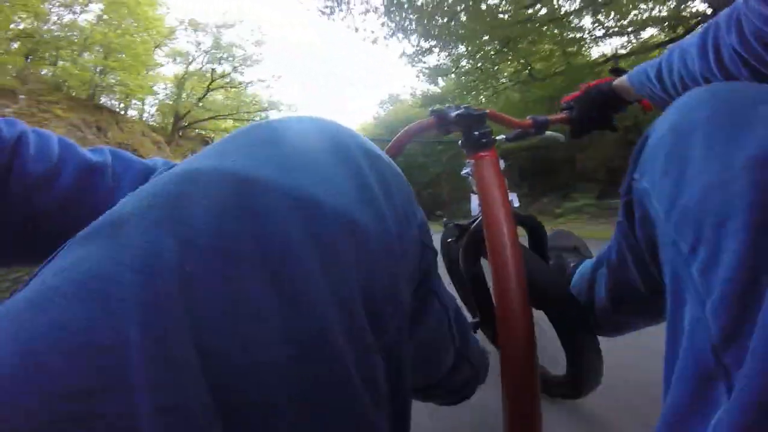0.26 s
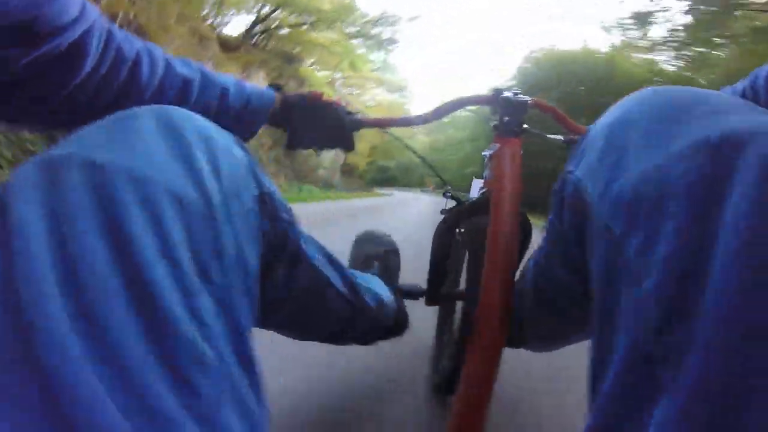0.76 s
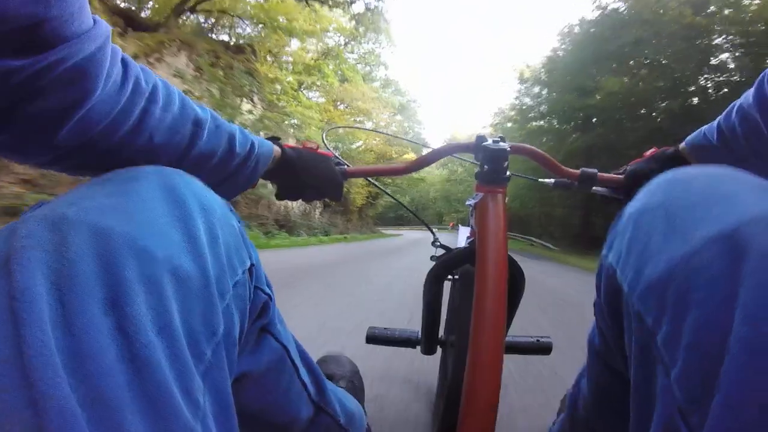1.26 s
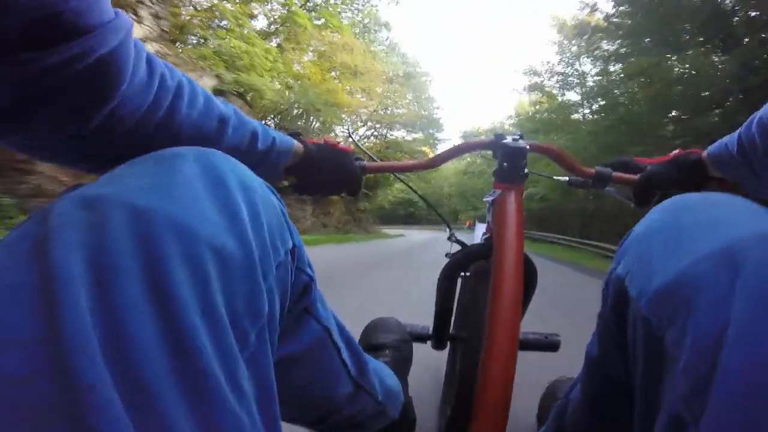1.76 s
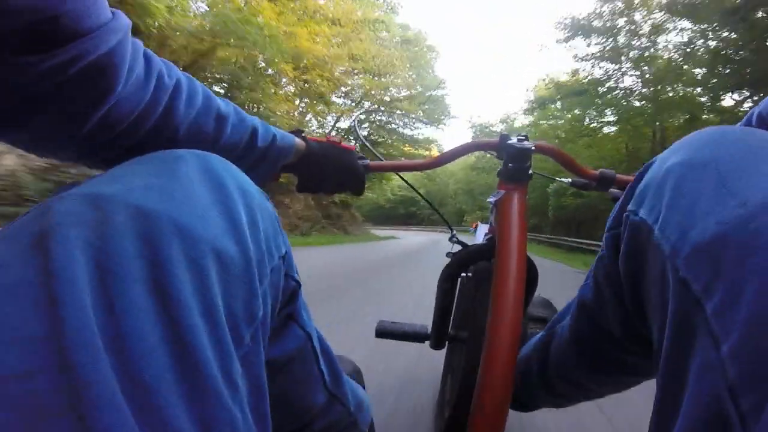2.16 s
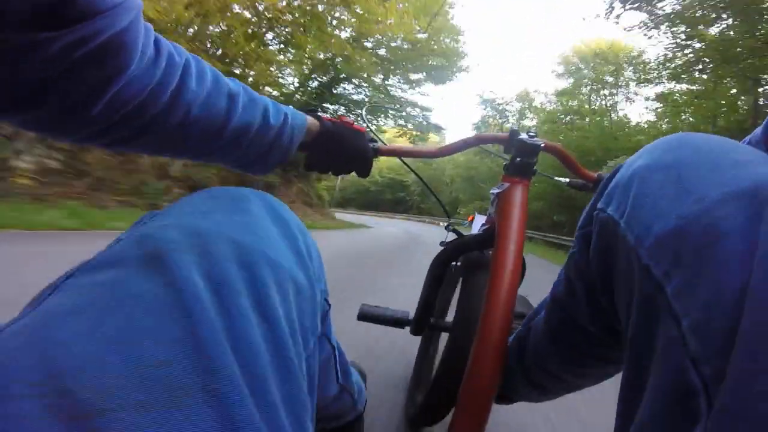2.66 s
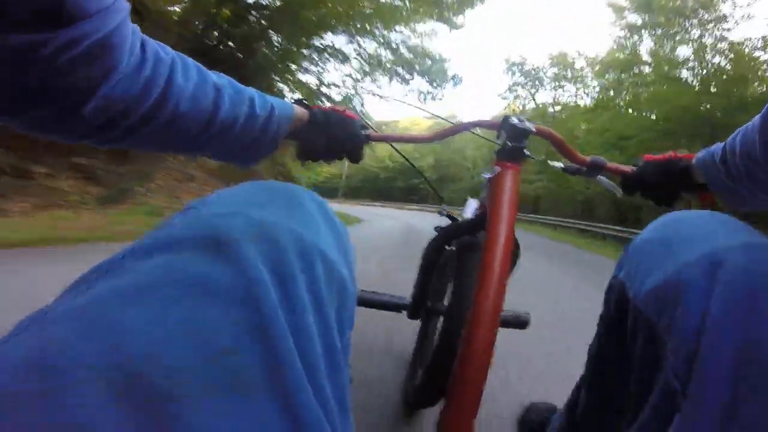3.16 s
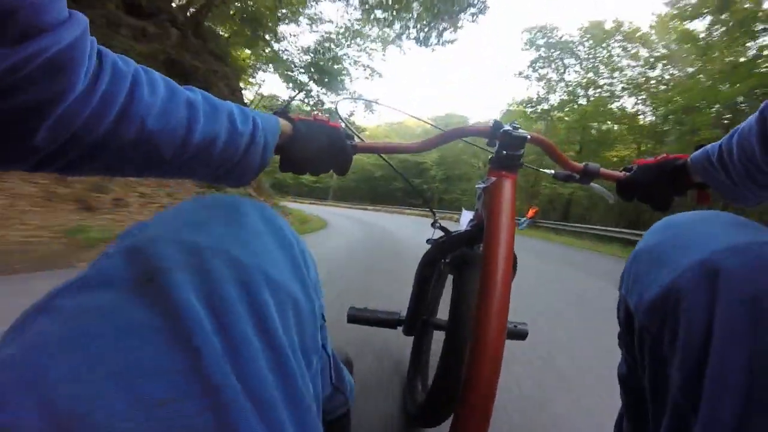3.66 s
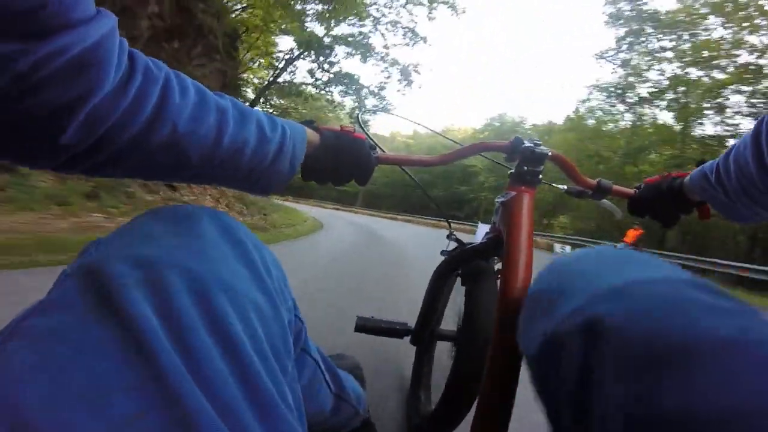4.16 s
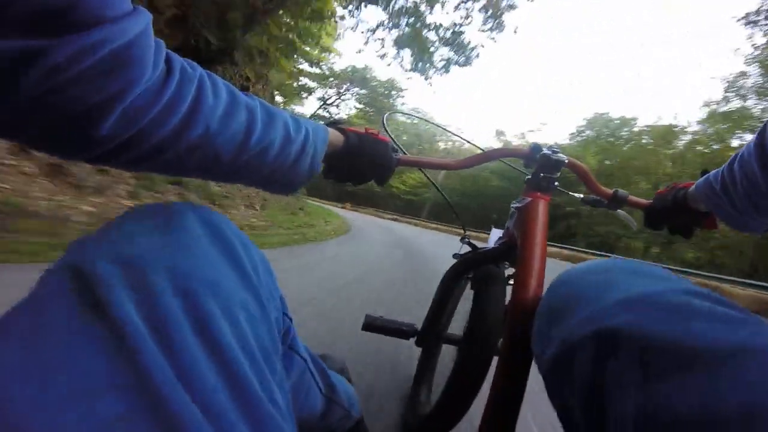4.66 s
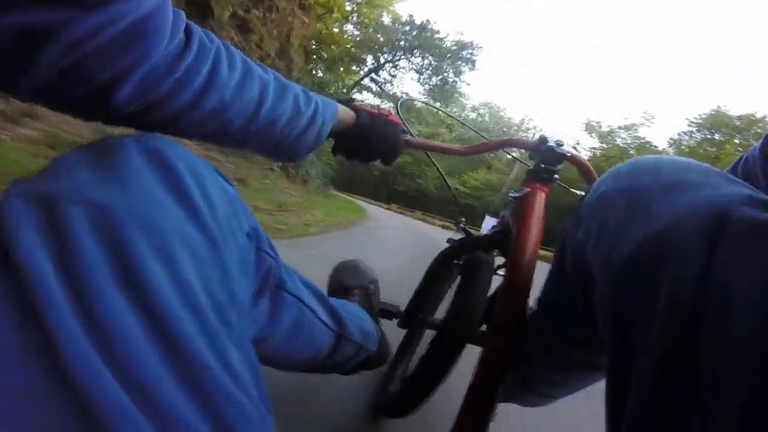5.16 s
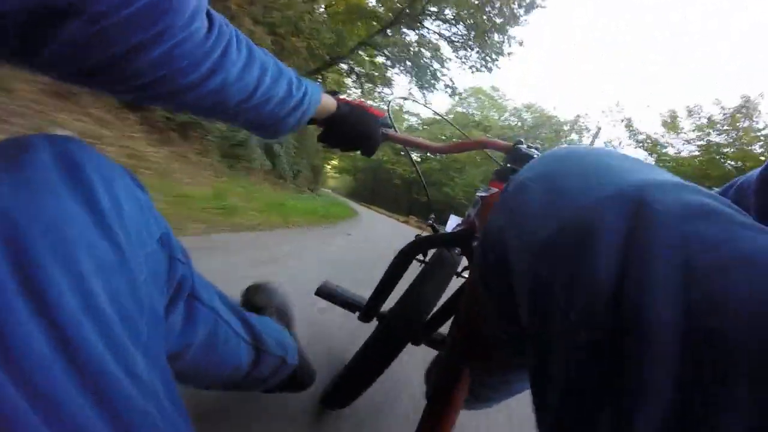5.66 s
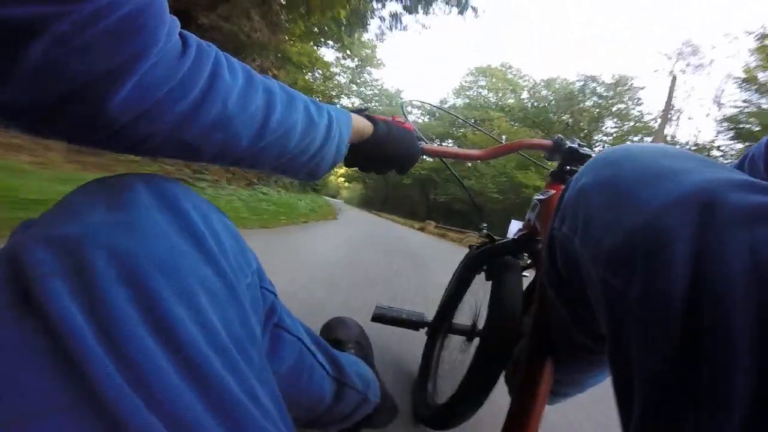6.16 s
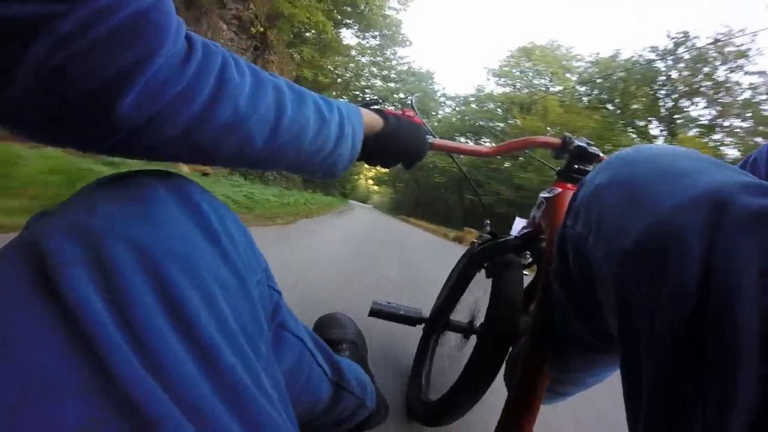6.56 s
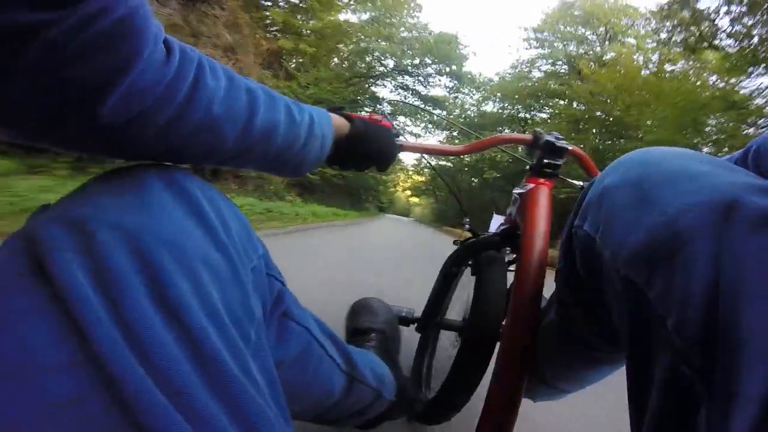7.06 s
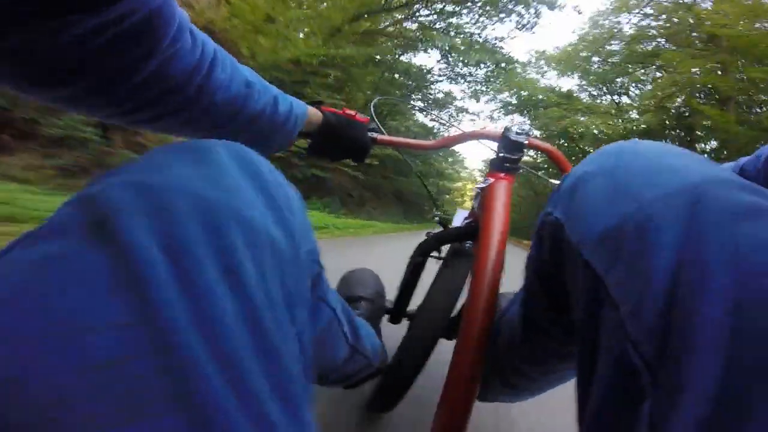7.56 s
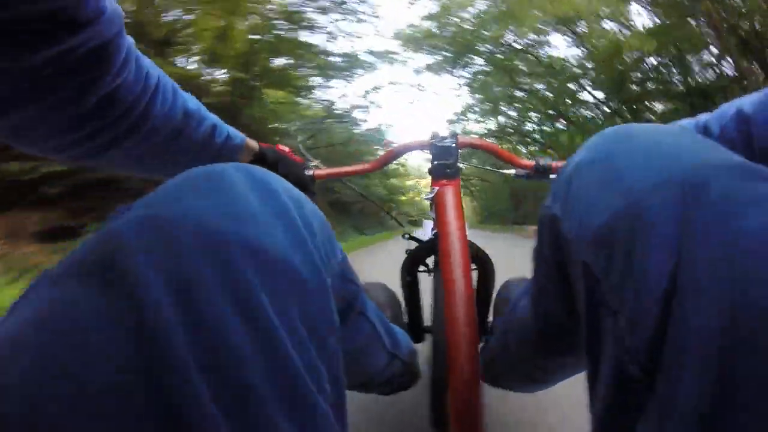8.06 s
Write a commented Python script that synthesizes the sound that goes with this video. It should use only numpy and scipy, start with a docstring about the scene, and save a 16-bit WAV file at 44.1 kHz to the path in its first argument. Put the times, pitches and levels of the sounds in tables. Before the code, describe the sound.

Hard hollow wheels whine and rumble fast over rough asphalt while stones tick and gusting wind flutters and thuds against a rider's microphone.

```python
"""A small trike with hard hollow wheels rolls and slides fast down rough asphalt.
The road's grit, made of noise and separate grains, shakes wheels and frame, which ring in fixed bands;
a stronger ring glides in pitch. Stones tick as short noise bursts, something squeaks in narrow trembling bands,
and the head wind rumbles, flutters and roars at a cased microphone on the rider."""
import sys
import numpy as np
from scipy import signal
from scipy.fft import rfft, irfft
from scipy.io import wavfile
from scipy.ndimage import uniform_filter1d

SR = 44100
rng = np.random.default_rng(int(sys.argv[2]) if len(sys.argv) > 2 else 0)


def dump(signal):
    """Clip the signal to [-1, 1] and save it as 16-bit WAV at the path in sys.argv[1]."""
    limited = np.clip(np.atleast_2d(signal).T, -1, 1)
    pcm = np.round(limited * 32767).astype(np.int16)
    wavfile.write(sys.argv[1], SR, pcm)


def attenuation_scalar(level_db):
    """Turn a level in dB into a linear amplitude multiplier (20 dB per decade)."""
    decades = np.asarray(level_db, float) / 20
    return 10 ** decades


N = 366894  # length of the scene in samples

# fixed ringing bands of the hollow wheels: (pitch [Hz], width before steepening [Hz], relative level [dB])
WHEEL = [(1230, 50, -22.5), (1792, 210, -11.5), (2256, 207, -5.5), (2685, 267, -7), (3077, 67, -15)]
# the ride: (time [s], rolling level [dB], pitch of the wheel's main ring [Hz], sideways sliding level [dB])
RIDE = [(0.03, -25, 1467, -34), (0.31, -33.5, 1507, -34), (0.72, -29, 1503, -36.5), (0.79, -26, 1484, -35),
        (1.67, -28, 1460, -33.5), (1.97, -30, 1465, -37.5), (2.48, -28, 1470, -38.5),
        (2.5, -29, 1445, -36.5), (2.52, -32, 1460, -41), (2.57, -26, 1470, -38), (2.78, -31.5, 1450, -36.5),
        (2.8, -29, 1430, -33.5), (3.38, -22.5, 1502, -30.5), (3.4, -25, 1504, -30),
        (3.68, -26.5, 1450, -32), (4.3, -30, 1450, -32.5), (5.09, -25, 1440, -29.5), (5.29, -28, 1460, -32),
        (5.34, -24.5, 1450, -28.5), (5.52, -28, 1478, -34.5), (6.22, -24, 1450, -28.5),
        (7.76, -29.5, 1453, -33.5), (8.11, -27.5, 1480, -37), (8.32, -27.5, 1480, -34)]
MEAN_ROLL_DB, MEAN_SLIDE_DB = -28, -33  # reference levels of the ride


def evened(x):
    """Scales to rms 1."""
    return x / np.sqrt(np.mean(x ** 2) + 1e-20)


def curves(rows):
    """The columns of a table after its time column, one value a sample."""
    s, *columns = np.transpose(rows)
    return [np.interp(np.arange(N) / SR, s, c) for c in columns]


def add(mix, s, sound):
    """Lays a sound into the mix at second s."""
    part = mix[round(s * SR):][:len(sound)]
    part += sound[:len(part)]


def coloured(x, shape_db, size=8192):
    """Filter that reacts only to past sound (minimum phase), with the gain shape_db(hz)."""
    hz = abs(np.fft.fftfreq(size, 1 / SR))
    log_gain = np.maximum(shape_db(hz), -120) * np.log(10) / 20
    taps = np.fft.ifft(np.exp(np.conj(signal.hilbert(log_gain)))).real
    return signal.oaconvolve(x, taps[:size // 2])[:len(x)]


def slope(points):
    """A spectrum drawn through (Hz, dB) points."""
    f, db = np.transpose(points)
    return lambda hz: np.interp(np.log(hz + 1), np.log(f + 1), db)


def modes(rows, steep):
    """A spectrum summed from resonances; steep sets how fast their skirts fall."""
    def shape_db(hz):
        power = sum(attenuation_scalar(2 * db) / (1 + (2 * (hz - f) / width) ** 2) ** steep for f, width, db in rows)
        return 10 * np.log10(power)
    return shape_db


def resonate(x, hz, width):
    """A resonance that follows the pitch hz; width [Hz] is that of one pass, two passes steepen the skirts."""
    turn = np.exp(2j * np.pi * np.cumsum(hz * np.ones(len(x))) / SR)
    r = np.exp(-np.pi * width / SR)
    # shift the pitch down to zero, smooth twice, shift back up
    smooth = signal.lfilter([(1 - r) ** 2], [1, -2 * r, r * r], x / turn)
    return 2 * (turn * smooth).real


def wander(top_hz):
    """Slow chance, rms 1, mostly below top_hz."""
    hz = np.fft.rfftfreq(N, 1 / SR)
    return evened(irfft(rfft(rng.standard_normal(N)) / (1 + (hz / top_hz) ** 4), N))


def bumps(centres, widths, heights):
    """A sum of bell-shaped rises, one value a sample."""
    t = np.arange(0, N, 32) / SR  # a coarse clock is enough for slow curves
    total = sum(h * np.exp(-4 * ((t - s) / w) ** 2) for s, w, h in np.broadcast(centres, widths, heights))
    return np.interp(np.arange(N) / SR, t, total)


def follows(control_db, mean_db, level_db, share):
    """Has level_db when the control is at mean_db, and follows the control by a share of 0-1."""
    return level_db + share * (control_db - mean_db)


def patchy(x, depth_db):
    """Lets the colour drift in patches some hundred hertz wide."""
    z = signal.stft(x, nperseg=512)[2]
    patches = uniform_filter1d(rng.standard_normal(z.shape), size=8, axis=0)  # across pitch
    patches = uniform_filter1d(patches, size=30, axis=1)  # across time
    return signal.istft(z * attenuation_scalar(depth_db * evened(patches)), nperseg=512)[1][:len(x)]


def wind():
    """Lumpy rumble, eddies shed at a wavering rate (not quite a sine), a low roar, and thumps."""
    # slow course of the head wind: (time [s], rumble level [dB], flutter level between the gusts [dB])
    head_wind = [(0.0, -34, -40.5), (0.51, -34.5, -35), (0.72, -35, -35.5), (1.64, -24, -34.5),
                 (2.59, -32.5, -37.5), (2.94, -29.5, -30), (3.36, -32.5, -41), (4.59, -22.5, -17.5),
                 (5.49, -32, -22), (5.68, -19.5, -22.5), (6.09, -22.5, -19.5), (6.81, -28, -25),
                 (7.04, -29, -33), (7.44, -43, -34), (7.65, -25.5, -29.5), (8.13, -40, -39),
                 (8.23, -31, -44), (8.32, -43, -28)]
    # gusts that set the eddies fluttering: (centre [s], level [dB], flutter rate [Hz])
    gusts = [(0.304, -29, 68.36), (0.453, -29.5, 69.5), (0.578, -20, 67.8), (0.98, -30.5, 54.2),
             (1.449, -32, 55.0), (2.728, -30, 65.9), (2.988, -30, 64.7), (3.211, -26.5, 58.03),
             (3.751, -27, 54.0), (3.912, -28, 52.77), (4.039, -21.5, 72), (4.128, -24, 67.1),
             (4.305, -18.5, 67.1), (4.393, -16, 62.2), (4.524, -17, 70.25), (4.618, -22, 69.53),
             (4.711, -26, 65.8), (4.789, -17.5, 67.2), (4.993, -17, 65.35), (5.136, -11, 64.4),
             (5.447, -19.4, 65.1), (5.626, -24, 56.13), (5.801, -17, 62.4), (5.927, -18.5, 55.1),
             (6.076, -12, 67.1), (6.255, -12, 67), (6.472, -13.5, 57.87), (6.583, -15, 57.0),
             (6.849, -13, 69.4), (6.946, -10.5, 63.1), (7.076, -14.2, 68.4), (7.183, -17, 60.4),
             (7.305, -21.5, 56.8), (7.628, -30, 59.2), (7.757, -18.5, 74.5), (8.236, -21, 69.1)]
    # colour of the rumble: (pitch [Hz], relative level [dB])
    rumble_colour = [(5, -20), (15, -8), (30, -6), (45, -13), (70, -33.5), (150, -52.5), (600, -110)]
    # colour of the roar: (pitch [Hz], relative level [dB])
    roar_colour = [(20, -34.5), (60, -15.5), (100, -12), (128, -16), (160, -17.5), (220, -30), (320, -26.5),
                   (1000, -40), (4000, -110)]
    # thumps of a gust: (start [s], peak level [dB], pitch [Hz], length [s])
    thumps = [(3.16, -17, 167, 0.022), (3.209, -28, 164.3, 0.036), (6.245, -11, 156.8, 0.012),
              (6.942, -15.5, 165, 0.029)]

    rumble_db, lull_db = curves(head_wind)
    gust_s, gust_db, gust_hz = np.transpose(gusts)
    lull_power = attenuation_scalar(2 * (lull_db + 3.5 * wander(8)))
    gust_power = bumps(gust_s, 0.07, attenuation_scalar(2 * gust_db))  # each gust swells for about 0.07 s
    flutter_db = 10 * np.log10(lull_power + gust_power)
    flutter_hz = np.interp(np.arange(N) / SR, gust_s, gust_hz)
    rumble_db = rumble_db + 1.3 * wander(6)
    roar_db = follows(flutter_db, -23.5, level_db=-34.5, share=0.35)
    roar_db = roar_db + 0.2 * (rumble_db + 29.5) + 2.6 * wander(11)

    rumble = evened(coloured(rng.standard_normal(N), slope(rumble_colour), size=32768))
    turns = 2 * np.pi * np.cumsum(flutter_hz * (1 + 0.089 * wander(26.04))) / SR
    shed = np.sin(turns) + 0.14 * np.sin(2 * turns + 0.61)
    rough = evened(resonate(rng.standard_normal(N), 1.09 * flutter_hz, 53.6))
    eddies = evened(shed + 0.56 * rough)
    roar = coloured(rng.standard_normal(N), slope(roar_colour), size=16384)
    roar = evened(roar * attenuation_scalar(0.67 * wander(36)))
    out = attenuation_scalar(rumble_db) * rumble + attenuation_scalar(flutter_db) * eddies + attenuation_scalar(roar_db) * roar
    for s, db, hz, length in thumps:
        t = np.arange(round(length * SR)) / SR
        add(out, s, attenuation_scalar(db) * np.sin(2 * np.pi * hz * t) * np.hanning(len(t)))
    return out


def squeaks():
    """Faint high squeaks: narrow bands of noise, which tremble by themselves."""
    # one row a squeak: (start [s], end [s], pitch [Hz], width of one filter pass [Hz], level before fading [dB])
    squeak_rows = [(1.2, 1.31, 10150, 450, -64), (1.38, 1.45, 10100, 450, -65),
                   (2.14, 2.21, 9650, 350, -64), (2.47, 2.54, 9600, 250, -65)]
    out = np.zeros(N)
    for start, end, hz, width, db in squeak_rows:
        noise = rng.standard_normal(round((end - start) * SR))
        squeak = evened(resonate(noise, hz, width))
        add(out, start, attenuation_scalar(db) * squeak * signal.windows.tukey(len(noise), 0.4))
    return out


def small_stones():
    """Lesser stones at chance moments, louder while the wheels slide."""
    when, size = rng.random((38, 2)).T
    slide_db = curves(RIDE)[2][(when * N).astype(int)]
    # -39.5 dB is the crack peak of a middling stone at the reference sliding level
    crack_db = -39.5 + 6 * (size - 0.5) + 1.4 * (slide_db - MEAN_SLIDE_DB)
    return [(s, db, -38, db + 20) for s, db in zip(when * N / SR, crack_db)]


def stones():
    """Each stone is a short burst: a bright crack, a puff of air above it and a knock on the wheel."""
    # loudest stones: (time [s], crack peak [dB], air relative to crack [dB], knock peak [dB])
    loud_stones = [(1.015, -37, -30, -32), (1.169, -38.5, -22, -23), (1.3137, -32, -25, -17.5),
                   (1.4396, -35.5, -36, -34), (1.5424, -43, -28, -15.5), (1.6842, -31.5, -25, -18),
                   (1.7375, -34, -29, -16.5), (2.135, -35.5, -28, -26), (2.1704, -44, -22, -39),
                   (2.399, -45, -26, -21), (2.6524, -46, -26, -19), (2.9128, -40.5, -32, -17),
                   (3.015, -47, -25, -28), (3.6838, -32, -23, -14.5), (3.8354, -36.5, -18, -36),
                   (4.4811, -42, -31, -12.5), (4.8773, -36.5, -22, -12.5), (5.0582, -41, -29, -23),
                   (5.3413, -40, -34, -15), (5.5159, -37, -30, -16.5), (5.5641, -30.5, -23, -12.5),
                   (5.6047, -33, -21, -19), (5.6136, -36, -19, -17.5), (5.6593, -34.5, -23, -12),
                   (5.7004, -34, -30, -18), (5.7259, -35.5, -33, -35), (5.749, -42, -15, -24),
                   (5.8272, -31, -16, -13.5), (5.8707, -34, -18, -16), (5.8886, -23.5, -21, -17),
                   (5.9713, -30.5, -20, -10), (5.9882, -26.5, -30, -11.5), (6.0374, -32, -19, -11.5),
                   (6.1604, -29.5, -24, -27), (6.2008, -32.5, -21, -17.5), (6.3094, -34, -22.5, -18),
                   (6.4465, -31, -28, -20), (6.517, -34, -25, -23), (6.545, -30.5, -20.5, -10.5),
                   (6.793, -43, -25, -21), (7.0229, -37, -35, -18), (7.1693, -34, -31, -14.5),
                   (7.5717, -43, -26, -22), (7.922, -49, -24, -13)]
    out, t = np.zeros(N), np.arange(1500) / SR
    shape = (1 - np.exp(-t / 0.00058)) * np.exp(-t / 0.003)  # quick rise, then dying away [s]
    # bands: (pitch [Hz], width before steepening [Hz], relative level [dB])
    crack = [(6260, 1500, 0), (7600, 1800, -4)]
    air = [(12400, 5100, 0)]
    knock = list(WHEEL) + [(1450, 130, 0.5)]
    for s, crack_db, air_db, knock_db in list(loud_stones) + small_stones():
        for db, bands in [(crack_db, crack), (crack_db + air_db, air), (knock_db, knock)]:
            noise = rng.standard_normal(len(t))
            burst = coloured(shape * noise, modes(bands, steep=1.49), size=2048)
            add(out, s, attenuation_scalar(db) * burst / abs(burst).max())
    return out


def bouncing():
    """The throb, in dB, of a wheel out of round that bounces once a turn."""
    # spells: (time of the strongest bounce [s], length [s], depth before each part's own factor [dB], turns [1/s])
    spells = [(1.799, 0.66, 1.5, 13.3), (2.498, .8, 2, 12.5), (4.302, 1.6, 0.6, 11), (6.563, 0.74, 2, 12.6),
              (7.591, 1.3, 1.9, 13.2)]
    t = np.arange(N) / SR
    return sum(bumps(s, length, db) * np.cos(2 * np.pi * per_s * (t - s)) for s, length, db, per_s in spells)


def grit(per_s, spread_db, share):
    """Road texture: a smooth rush plus separate grains of uneven size, which hold a share of the power."""
    sizes = attenuation_scalar(spread_db * np.minimum(rng.exponential(1, N), 5))
    grains = (rng.random(N) < per_s / SR) * sizes * rng.choice([-1., 1.], N)
    return np.sqrt(share) * evened(grains) + np.sqrt(1 - share) * rng.standard_normal(N)


def rolling():
    """Grit under the chattering, bouncing wheels drives the ringing wheel, the frame, the scrub and the hiss."""
    # ringing bands of the frame: (pitch [Hz], width before steepening [Hz], relative level [dB])
    frame_bands = [(359.4, 49.5, 1), (513.6, 94, -8), (780, 170, -25)]
    # bands of the scrubbing sound: (pitch [Hz], width before steepening [Hz], relative level [dB])
    scrub_bands = [(3500, 300, 11.5), (3966, 320, 10), (4186, 950, 8.5), (5100, 400, -29.5), (6140, 990, 2),
                   (7120, 360, -0.5), (7970, 1000, -6.5)]
    # colour of the finest hiss: (pitch [Hz], relative level [dB])
    hiss_colour = [(4000, -66.5), (7800, -2), (9200, 3), (10300, -1.5), (11000, -4), (11800, -6),
                   (13000, -14.5), (15000, -17), (17000, -45)]
    # swells of that hiss in the bends: (centre [s], length [s], rise [dB])
    swells = [(1.451, .5, 5), (3.503, 0.86, 7.5), (4.85, .4, 4), (6.101, .7, 3), (6.9, .6, 2),
              (8.2, .3, 1.5)]
    # the plastic of the wheels loses the treble: (pitch [Hz], gain [dB])
    damping = [(5000, 0), (9000, 0.5), (12000, -23), (20000, -44.5)]

    # levels and pitch over time
    roll_db, ring_hz, slide_db = curves(RIDE)
    bounce = bouncing()
    surface = -0.1 * wander(12)  # uneven asphalt: slow chance in level [dB], and in pitch below
    ring_db = roll_db + 1.4 * bounce + 0.77 * surface + 1.08 * wander(7.4)
    ring_hz = ring_hz + 11 * wander(7.3)
    frame_db = follows(roll_db, MEAN_ROLL_DB, level_db=-34.5, share=0.52)
    frame_db = frame_db + 0.26 * (slide_db - MEAN_SLIDE_DB) + 0.83 * wander(11)
    upper_db = follows(slide_db, MEAN_SLIDE_DB, level_db=-32.5, share=1) + 1.18 * bounce + surface
    scrub_db = follows(slide_db, MEAN_SLIDE_DB, level_db=-44.5, share=0.62)
    scrub_db = scrub_db + 0.22 * (roll_db - MEAN_ROLL_DB) + 0.86 * bounce + 0.8 * surface
    hiss_db = follows(slide_db, MEAN_SLIDE_DB, level_db=-68, share=0.33) + bumps(*np.transpose(swells))

    # the grit that drives each part; the chatter makes it swell and fade quickly
    chatter = evened(wander(21.4) + 1.55 * wander(100))
    road = grit(2500, spread_db=2.5, share=0.3)
    scraped = 0.6 * road + 0.8 * grit(2500, spread_db=4.0, share=0.3)
    ring_grit = grit(1500, spread_db=3.0, share=0.32) * attenuation_scalar(chatter)
    frame_grit = grit(800, spread_db=4.0, share=0.23) * attenuation_scalar(1.4 * chatter)
    scrub_grit = scraped * attenuation_scalar(1.7 * chatter + 1.2 * wander(66))
    hiss_grit = grit(1500, spread_db=2.0, share=0.35) * attenuation_scalar(0.6 * chatter + 1.1 * wander(50))

    # the parts, each at rms 1 before its level
    ring = evened(resonate(ring_grit, ring_hz, width=183))
    upper = evened(coloured(road * attenuation_scalar(1.72 * chatter), modes(WHEEL, steep=1.406)))
    wheel = coloured(attenuation_scalar(ring_db) * ring + attenuation_scalar(upper_db) * upper, slope(damping), size=512)
    frame = evened(coloured(frame_grit, modes(frame_bands, steep=1.506)))
    scrub = evened(patchy(coloured(scrub_grit, modes(scrub_bands, steep=1.9)), depth_db=1.0))
    hiss = evened(patchy(coloured(hiss_grit, slope(hiss_colour)), depth_db=1.2))
    return wheel + attenuation_scalar(frame_db) * frame + attenuation_scalar(scrub_db) * scrub + attenuation_scalar(hiss_db) * hiss


def scene():
    """All sources, one channel."""
    return (wind() + squeaks() + stones() + rolling())[None]


def low_pass(x):
    """Removes everything above the highest recorded frequency."""
    return signal.sosfilt(signal.butter(12, 15150, fs=SR, output="sos"), x)


def record(dry):
    """The input softly rounds off the highest peaks."""
    rounded = 1.2 * np.tanh(dry / 1.2)
    return low_pass(rounded)


dry = scene()
out = record(dry)
dump(out)
```